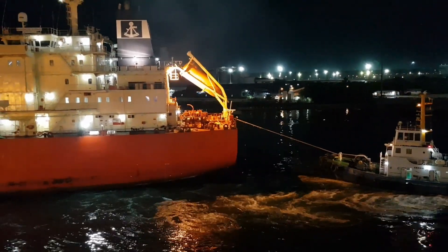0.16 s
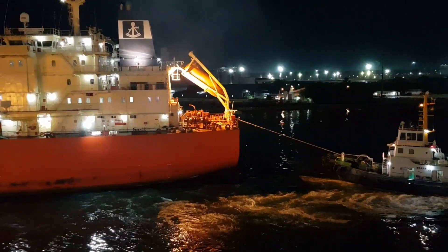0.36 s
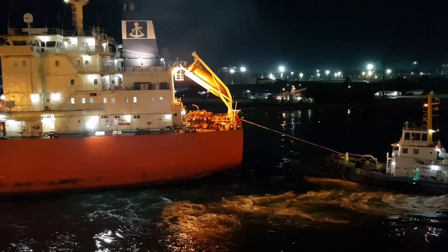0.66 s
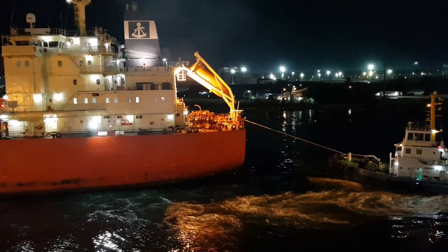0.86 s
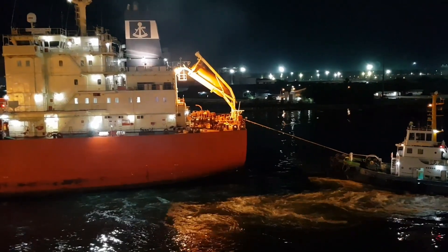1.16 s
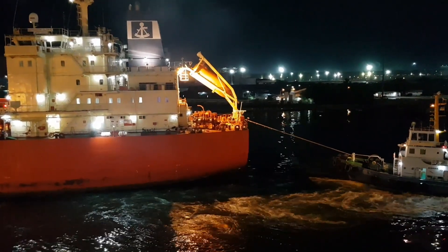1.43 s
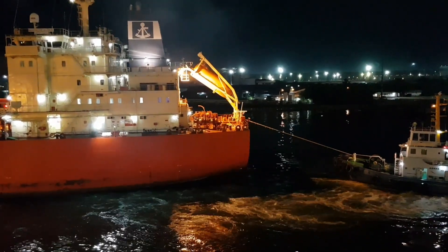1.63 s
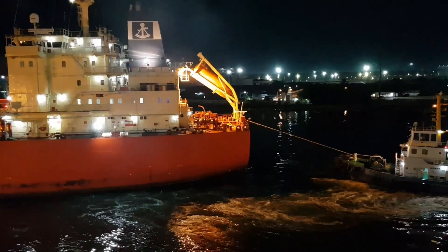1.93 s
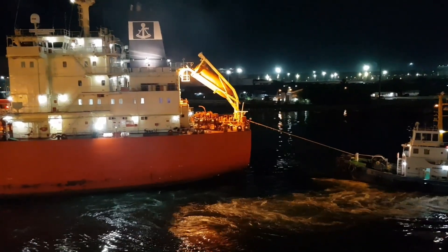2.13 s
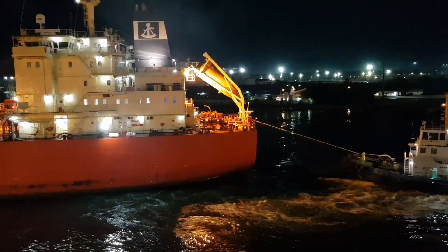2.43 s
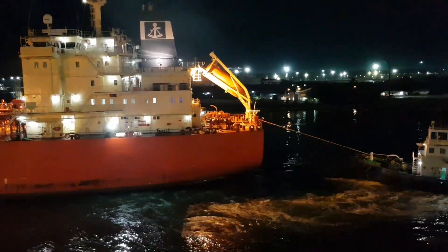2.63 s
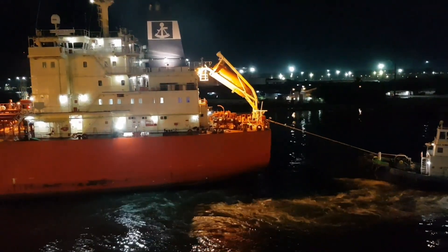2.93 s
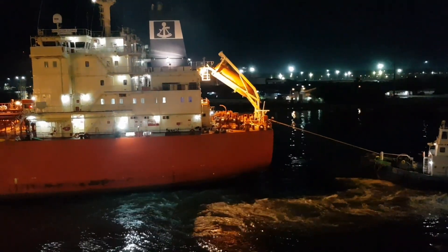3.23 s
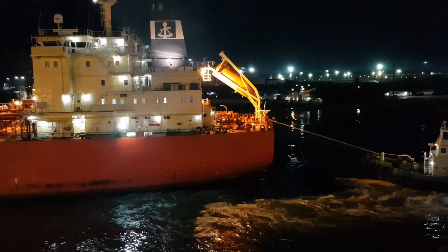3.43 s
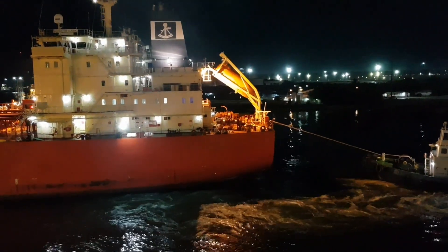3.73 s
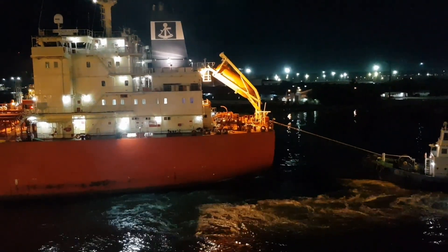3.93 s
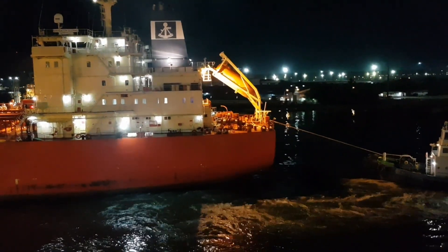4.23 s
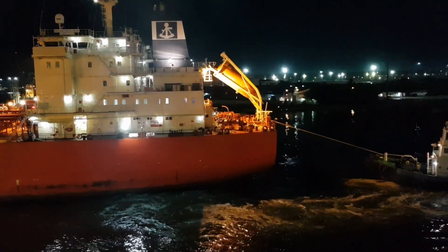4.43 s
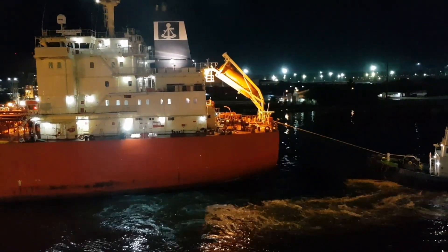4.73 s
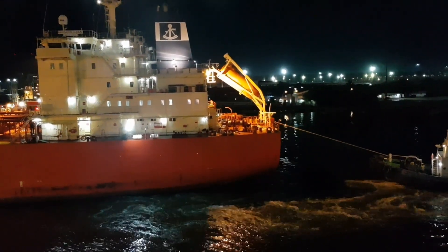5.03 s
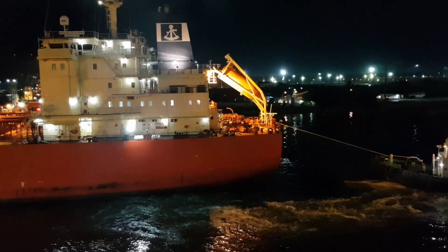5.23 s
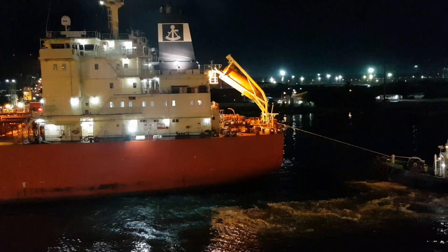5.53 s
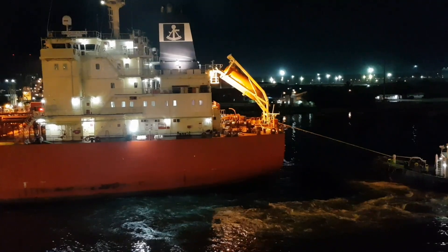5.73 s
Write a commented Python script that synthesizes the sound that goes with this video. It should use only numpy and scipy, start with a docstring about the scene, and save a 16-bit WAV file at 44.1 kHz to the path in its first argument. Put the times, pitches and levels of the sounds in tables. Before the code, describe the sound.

Outdoors on a harbour at night, heard from a vessel's deck, a ship's diesel drones without a break. Deep rumble surges and booms, a low hum wavers, exhaust throbs fast and hollow. Air hisses softly above, water fizzes very faintly, and three dull knocks come near the middle. Stereo, sources to the right.

```python
"""A ship's diesel drones across a harbour, heard from the deck of a vessel under way beside a tug and a tanker.
The rumble surges and booms as coloured noise, an undertone swells, and exhaust noise rings in its duct.
A sine hum and weaker partials waver on one engine speed; firing strokes pulse the exhaust, roar, hiss and wash.
Housings colour the roar, air hisses, churned water fizzes faintly, and dull knocks come near the middle.
All of it stands to the right of two microphone ports, which colour the sound differently."""
import sys
import numpy as np
from scipy import signal
from scipy.fft import rfft, irfft, next_fast_len
from scipy.io import wavfile
from scipy.ndimage import uniform_filter1d, map_coordinates

SR = 44100
rng = np.random.default_rng(int(sys.argv[2]) if len(sys.argv) > 2 else 0)


def dump(signal):
    """Clip the signal to [-1, 1] and save it as 16-bit WAV at the path in sys.argv[1]."""
    limited = np.clip(np.atleast_2d(signal).T, -1, 1)
    pcm = np.round(limited * 32767).astype(np.int16)
    wavfile.write(sys.argv[1], SR, pcm)


N = 258867

# Deep noise of engines and propellers. Each row: frequency in Hz, relative density in dB per Hz.
RUMBLE_SPECTRUM = [(6, -26), (18, -18), (28, -9), (44, -3), (58, 1.5), (66, -4), (77, -2), (97, -6.5),
                   (116, -4.5), (130, -11.5), (200, -30), (600, -100)]
# Surges of the rumble. Each row: time in seconds, level around the mean in dB.
RUMBLE_SURGE = [(0.0, 0), (0.17, 4.5), (0.27, -1), (0.4, 2.5), (0.68, -2.5), (1.0, 3), (1.2, -3), (1.43, 3),
                (1.8, -1), (1.92, 4), (2.11, -2.5), (2.25, -0.5), (2.4, -2), (2.52, 5), (2.66, -0.5),
                (3.2, 2.3), (3.32, -1.5), (3.42, 2.7), (3.9, -1.2), (4.08, 2.5), (4.3, 2), (4.45, -3),
                (4.58, 0.5), (4.72, -2), (4.88, 1), (5.02, -2), (5.13, 2), (5.3, -2), (5.43, 3), (5.55, -5),
                (5.66, 1), (5.87, 0)]
# Swells of the undertone. Each row: time in seconds, level around the mean in dB.
UNDERTONE_SWELL = [(0, -3), (0.35, -1), (0.82, 5.5), (1.12, -5), (1.43, 7), (1.68, 0.5), (2.4, 3.5),
                   (2.62, 1), (2.82, 6.5), (3.1, -10), (3.52, 2.5), (3.85, -3), (4.1, -1), (4.36, -5),
                   (4.55, 2), (5.0, 1), (5.58, -4), (5.87, -0.5)]
# Resonances of the exhaust duct. Each row: centre in Hz, width in Hz, relative level in dB.
DUCT_MODES = [(183.8, 19, 0), (211.3, 26, -1), (234.3, 40, 1.2), (268.3, 25.5, 0.5), (297.8, 63, -1.2),
              (346, 48, -2), (381, 36, -7), (424, 30, -19.5)]
# Swells of the exhaust. Each row: time in seconds, level around the mean in dB.
EXHAUST_SWELL = [(0.0, 0), (0.21, -1.1), (0.58, 0), (0.72, -1.8), (0.85, 1.5), (1.0, -2.5), (1.2, 1.2),
                 (1.36, -1), (1.69, -0.6), (1.8, 1), (1.93, 1.5), (2.05, -2.5), (2.15, -0.5), (2.75, 0.3),
                 (3.28, 1.1), (3.74, -2.5), (4.03, 2.1), (4.24, -0.6), (4.37, 1.5), (4.75, -2), (5.13, 2),
                 (5.43, -1.7), (5.87, 1)]
# Pitch of the hum, which carries the engine speed. Each row: time in seconds, pitch in Hz.
HUM_PITCH = [(0.0, 193.6), (1.87, 194.0), (2.16, 198), (2.27, 193.6), (2.92, 193.2), (3.16, 197.8),
             (3.61, 192.9), (3.94, 195.4), (4.06, 190.3), (4.47, 196.8), (4.56, 193), (5.21, 194.8),
             (5.87, 192.9)]
# Swells of the hum. Each row: time in seconds, level around the mean in dB.
HUM_SWELL = [(0.0, 0), (0.29, 1.5), (0.41, -3), (0.48, 0), (0.7, -1), (1.1, 1.5), (1.28, -0.5), (1.6, 5.5),
             (1.95, -1.5), (2.1, 2), (2.24, -2.5), (2.39, 3), (2.53, -3.5), (2.76, 4), (3.08, 0),
             (3.29, 3.5), (3.41, -3), (3.52, 2.5), (3.68, -3.5), (3.86, 3.5), (4.02, -5), (4.16, 4.5),
             (4.25, -10), (4.35, 1.5), (4.87, -3.5), (5.16, 5.5), (5.3, 0), (5.4, 2.5), (5.63, -5.5),
             (5.81, 7.5), (5.87, -14)]
# Weaker engine tones. Each row: frequency at mean speed in Hz, relative level in dB, waver in Hz.
ENGINE_PARTIALS = [(74.55, -31, 6.03), (231.4, -36, 3.85), (267.2, -30.5, 4.06), (346.6, -34.5, 4.03),
                   (506.5, -48.5, 12.04), (734, -50.5, 13), (843, -48, 13.7), (929, -51, 10),
                   (1060, -55, 7.5), (1117, -57, 8)]
# Broad machinery noise. Each row: frequency in Hz, relative density in dB per Hz.
ROAR_SPECTRUM = [(100, -54), (300, -10.5), (430, -2.5), (510, -1.5), (620, -6.5), (730, -6.5), (785, -5.5),
                 (850, -4), (1000, -9), (1250, -13.5), (1700, -20), (3000, -34.5), (8000, -100)]
# Resonances of the steel housings in the roar. Each row: centre in Hz, width in Hz, level over the roar in dB.
HOUSING_MODES = [(508, 99, -1.5), (550, 20, -5), (715, 147, 1), (837, 50, -7), (1090, 70, 0.5)]
# Swells of the roar. Each row: time in seconds, level around the mean in dB.
ROAR_SWELL = [(0.0, -0.13), (0.68, -0.27), (0.88, -0.19), (1.24, -0.78), (1.5, 0.66), (2.01, -0.16),
              (2.8, 0.87), (3.0, -0.33), (3.18, 0.39), (4.38, -0.089), (4.66, 0.71), (4.84, -0.6),
              (5.87, 0.46)]
# Hiss of the air. Each row: frequency in Hz, relative density in dB per Hz.
HISS_SPECTRUM = [(500, -27), (1200, -0.5), (1700, -1.7), (2200, -3.6), (2900, -5.5), (3400, -8), (4400, -9),
                 (5100, -11), (5600, -15.0), (6500, -17), (7500, -22.5), (10000, -44)]
# Swells of the hiss. Each row: time in seconds, level around the mean in dB.
HISS_SWELL = [(0.0, -0.2), (0.6, 0.4), (0.88, -0.4), (1.22, 0.41), (1.7, -0.2), (1.89, 0.5), (2.1, -0.1),
              (3.15, 0.6), (3.74, -0.25), (4.45, -0.25), (5.05, 0.13), (5.5, -0.2), (5.87, 0.2)]
# Fizz of the churned water. Each row: frequency in Hz, relative density in dB per Hz.
FIZZ_SPECTRUM = [(4000, -32), (6500, -13), (7500, 1), (8500, 3.5), (9500, 3.5), (11000, 4.5), (12500, 2),
                 (13700, -0.5), (14700, -4), (15600, -16.2)]
# Dull knocks in the drone. Each row: start in seconds, starting level in dB.
KNOCK_EVENTS = [(2.738, -7), (2.908, -6), (3.107, -6)]
# Likeness of the noise at the two ports. Each row: frequency in Hz, coherence from 0 to 1.
PORT_COHERENCE = [(90, 1), (145, 0.75), (220, 0.91), (350, 1), (450, 0.076), (700, 0.62), (1800, 0.5),
                  (2400, 0.11), (12000, 0.099)]
# Left microphone port against the right. Each row: frequency in Hz, level ratio in dB.
PORT_BALANCE = [(100, -0.5), (180, -3.5), (270, -2.5), (355, 3), (490, -4), (590, -2), (820, -6),
                (1000, -3.5), (3400, -4.5), (4800, -8.5), (6600, -3.5), (8000, -13), (10500, -1.5),
                (14000, -5.5)]

HUM_ORDER = 5  # cycles of the hum per firing stroke
EXHAUST_THROB = 0.18  # depth to which the firing strokes beat in the exhaust
TOP_HZ = 15750  # band limit of the microphones


def amp(db):
    """Decibels to gain."""
    return 10 ** (np.asarray(db) / 20)


def unit(x):
    """Scale to rms 1."""
    return x / np.sqrt(np.mean(x ** 2) + 1e-20)


def along(points, hz):
    """Read (Hz, value) points on a log frequency axis."""
    point_hz, values = np.transpose(points)
    return np.interp(np.log(hz + 1), np.log(point_hz + 1), values)


def curve(rows):
    """Join (seconds, value) points into one value per sample."""
    seconds, values = np.transpose(rows)
    return np.interp(np.arange(N) / SR, seconds, values)


def wobble(rate):
    """A smooth random curve with the given number of knots a second."""
    knots = rng.standard_normal(int(N * rate / SR) + 4)
    return map_coordinates(knots, [np.arange(N) * rate / SR])


def filtered(x, response):
    """Shape x by a response, real or complex, given as a function of frequency in Hz."""
    size = next_fast_len(N + SR // 2)
    spectrum = rfft(x, size) * response(np.fft.rfftfreq(size, 1 / SR))
    return irfft(spectrum, size)[..., :N]


def resonances(modes, hz):
    """Gain of steep-sided resonances whose powers add."""
    power = 0
    for centre, width, db in modes:
        power = power + (amp(db) / (1 + (2 * (hz - centre) / width) ** 2)) ** 2
    return np.sqrt(power)


def rush(gain):
    """Coloured stereo noise of rms 1; its mid and side parts set how alike the ports hear it."""
    def mid_and_side(hz):
        angle = np.arccos(np.clip(along(PORT_COHERENCE, hz), -1, 1)) / 2
        return gain(hz) * np.array([np.cos(angle), np.sin(angle)])
    mid, side = filtered(rng.standard_normal((2, N)), mid_and_side)
    return unit(np.array([mid + side, mid - side]))


def steady(x, seconds):
    """Even out the noise's own power over about the given time, so that the level curves set its swells."""
    size = max(int(seconds * SR), 2)
    power = uniform_filter1d(uniform_filter1d(np.mean(x ** 2, 0), size), size)
    return x / np.sqrt(np.abs(power) + 1e-9)


def patchy(x, depth_db, width_hz, seconds):
    """Let neighbouring bands swell and fade apart from each other."""
    hz, t, bands = signal.stft(x, SR, nperseg=1024)
    grid = np.meshgrid(hz / width_hz, t / seconds, indexing="ij")
    field = map_coordinates(rng.standard_normal((200, 200)), grid, mode="mirror")
    return unit(signal.istft(bands * amp(depth_db * field), nperseg=1024)[1][:, :N])


def firing(throb, flutter_db):
    """Gain that each firing stroke lifts; the hum is a multiple of their rate, and their strength varies."""
    rate_hz = curve(HUM_PITCH) / HUM_ORDER
    beat = 1 + throb * np.cos(2 * np.pi * np.cumsum(rate_hz) / SR)
    return beat * amp(flutter_db * wobble(rate_hz.mean()))


def rumble(level_db=-25.0, boom_hz=68, boom_width_hz=22, boom_db=-8.5):
    """The deep rumble of engines and propellers surges; a low resonance booms more on each surge."""
    surge_db = curve(RUMBLE_SURGE)
    noise = rush(lambda hz: amp(along(RUMBLE_SPECTRUM, hz)))
    boom = rush(lambda hz: resonances([(boom_hz, boom_width_hz, 0)], hz))
    mix = noise + amp(boom_db + surge_db) * boom
    return amp(level_db + surge_db) * steady(mix, seconds=0.069)


def undertone(centre_hz=148, width_hz=30, level_db=-30.0):
    """Noise rings a hollow resonance below the hum, swelling and fading."""
    ring = rush(lambda hz: resonances([(centre_hz, width_hz, 0)], hz))
    return amp(level_db + curve(UNDERTONE_SWELL)) * steady(ring, seconds=0.089)


def exhaust(swell_db, level_db=-22.0, wander=0.005):
    """Turbulent gas rings the resonances of the duct, which wander a little in pitch."""
    noise = rush(lambda hz: resonances(DUCT_MODES, hz))
    # An uneven reading speed moves all the resonances together.
    clock = np.arange(N) + np.cumsum(wander * wobble(5))
    ring = np.array([map_coordinates(port, [clock], mode="mirror") for port in noise])
    return amp(level_db + swell_db) * steady(ring, seconds=0.11)


def hum(level_db=-24.5, waver_hz=1.8, flutter_db=1.4):
    """The engine's one strong tone swells and fades unevenly, wavers in pitch and flutters in level."""
    pitch_hz = curve(HUM_PITCH) + waver_hz * wobble(20)
    tone = np.sin(2 * np.pi * np.cumsum(pitch_hz) / SR)
    return amp(level_db + curve(HUM_SWELL)) * unit(tone * amp(flutter_db * wobble(18)))


def partials(swell_db, level_db=-1.0, flutter_db=1.25):
    """Weaker tones follow the hum's speed and half the exhaust's dB swell, each wavering in its own way."""
    pitch_hz = curve(HUM_PITCH)
    speed = pitch_hz / pitch_hz.mean()
    total = np.zeros(N)
    for hz, db, waver_hz in ENGINE_PARTIALS:
        tone = np.sin(2 * np.pi * np.cumsum(hz * speed + waver_hz * wobble(26)) / SR)
        fluttering = unit(tone * amp(flutter_db * wobble(14)))
        total += amp(level_db + db + swell_db / 2) * fluttering
    return total


def machinery(level_db=-29.0, patchy_db=0.84):
    """Machinery roar, coloured by its steel housings; its bands drift in level on the way over the water."""
    roar = rush(lambda hz: amp(along(ROAR_SPECTRUM, hz)) * np.hypot(1, resonances(HOUSING_MODES, hz)))
    drifting = patchy(roar, patchy_db, width_hz=90.1, seconds=0.253)
    return amp(level_db + curve(ROAR_SWELL)) * drifting


def air(level_db=-39.5, flutter_db=0.54, patchy_db=0.7):
    """The hiss of air through the intakes and the funnel, in gentle swells and patches with a quick flutter."""
    flutter = unit(filtered(wobble(60), lambda hz: hz > 8))
    noise = rush(lambda hz: amp(along(HISS_SPECTRUM, hz)))
    hiss = patchy(noise, patchy_db, width_hz=449, seconds=0.07)
    return amp(level_db + curve(HISS_SWELL) + flutter_db * flutter) * hiss


def wash(level_db=-52.0, bursts_per_s=2000, grain=0.55, lapping_db=0.8):
    """Foam in the propeller wash: countless tiny bursts on a soft hiss."""
    def colour(hz):
        return amp(along(FIZZ_SPECTRUM, hz))
    bursts = rng.standard_normal((2, N)) * (rng.random((2, N)) < bursts_per_s / SR)
    foam = unit(rush(colour) + grain * unit(filtered(bursts, colour)))
    return amp(level_db + lapping_db * wobble(55)) * foam


def knocks(ring_hz=285, t60_s=0.018):
    """A few short, dull knocks, half buried in the drone: sines that die away by 60 dB in t60_s."""
    out = np.zeros(N)
    t = np.arange(SR // 10) / SR
    knock = np.sin(2 * np.pi * ring_hz * t) * np.exp(-np.log(1000) * t / t60_s)
    for start_s, db in KNOCK_EVENTS:
        start = round(start_s * SR)
        out[start:start + len(t)] += amp(db) * knock
    return out


def from_right(x, ms):
    """A source to the right reaches the left port later; half the gap is put on each port."""
    sign = np.array([[-1], [1]])  # left later, right earlier
    return filtered(x, lambda hz: np.exp(1j * np.pi * hz * ms / 1000 * sign))


def scene():
    """The drone and the rushing sounds all stand to the right of the ports."""
    swell_db = curve(EXHAUST_SWELL)
    drone = rumble() + undertone()
    drone += firing(throb=EXHAUST_THROB, flutter_db=0.46) * exhaust(swell_db)
    drone += hum() + partials(swell_db) + knocks()
    rushing = firing(throb=0.022, flutter_db=0.5) * (machinery() + air() + wash())
    return from_right(drone, ms=0.31) + from_right(rushing, ms=0.35)


def record(dry):
    """Each port has its own colour at a shared total power, and nothing passes above the band limit."""
    def ports(hz):
        ratio = amp(along(PORT_BALANCE, hz))
        even_power = np.sqrt(2 / (1 + ratio ** 2))
        return np.array([ratio, np.ones_like(ratio)]) * even_power * (hz < TOP_HZ)
    return filtered(dry, ports)


dry = scene()
out = record(dry)
dump(out)
```